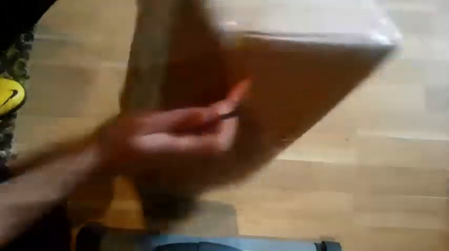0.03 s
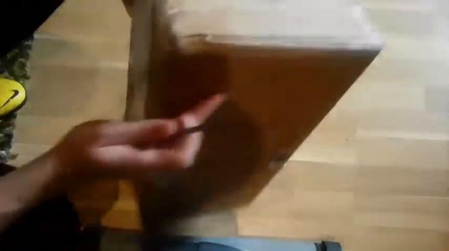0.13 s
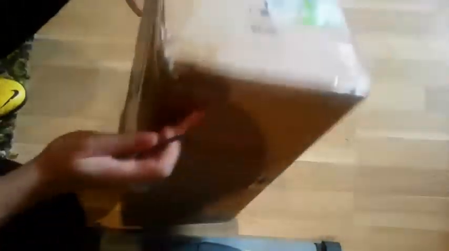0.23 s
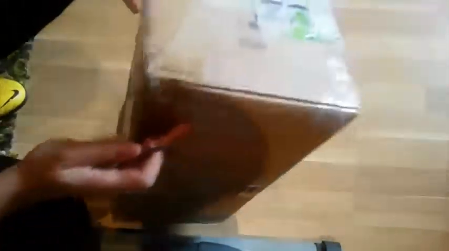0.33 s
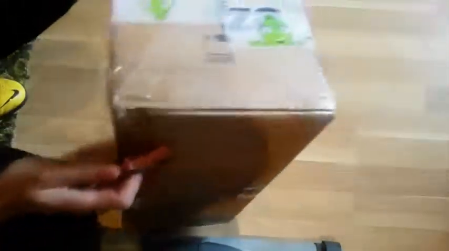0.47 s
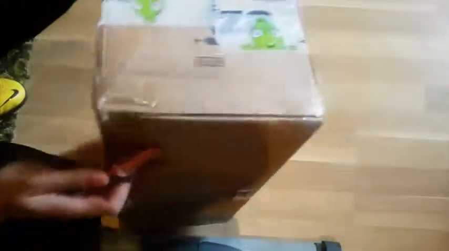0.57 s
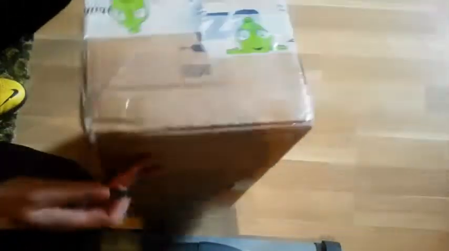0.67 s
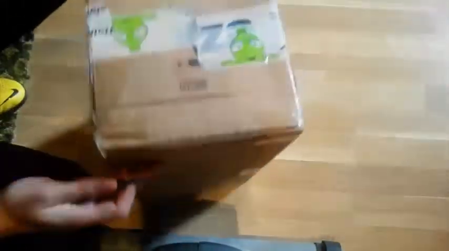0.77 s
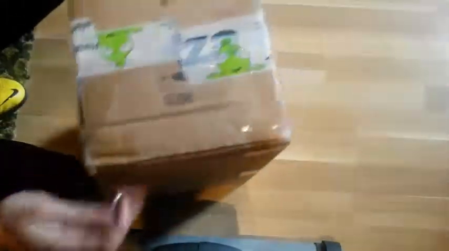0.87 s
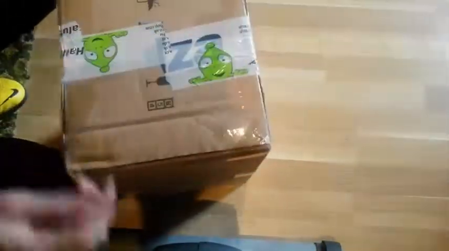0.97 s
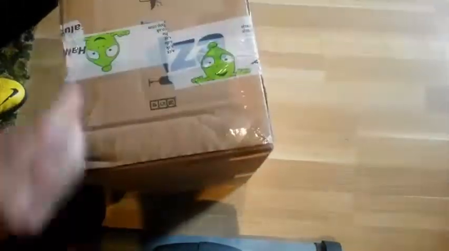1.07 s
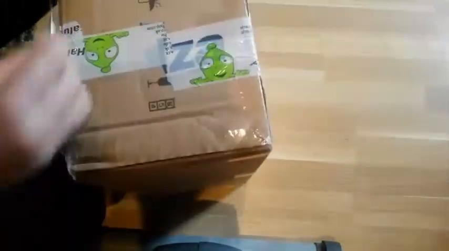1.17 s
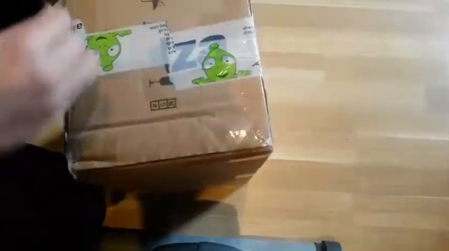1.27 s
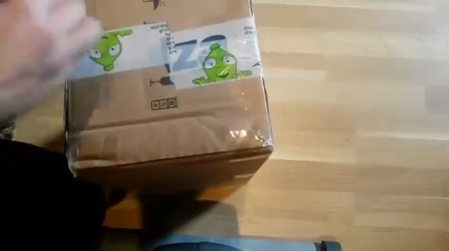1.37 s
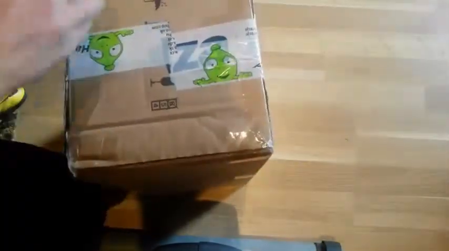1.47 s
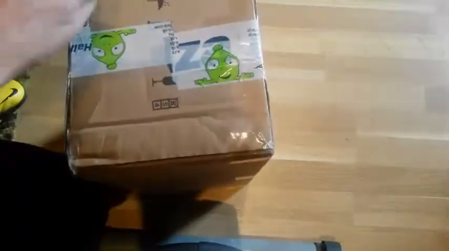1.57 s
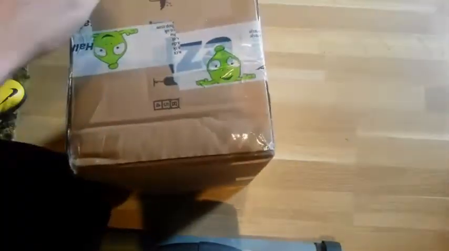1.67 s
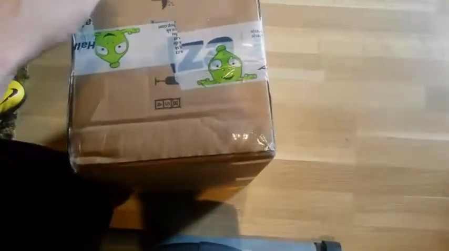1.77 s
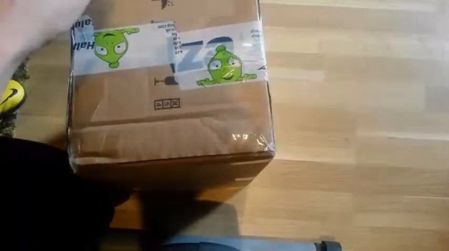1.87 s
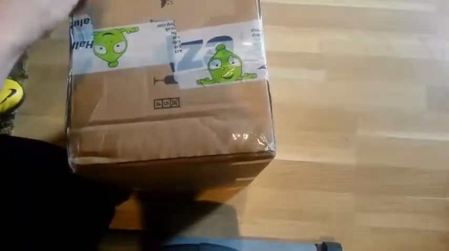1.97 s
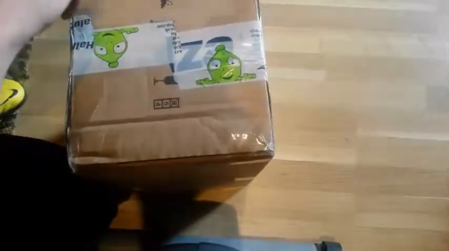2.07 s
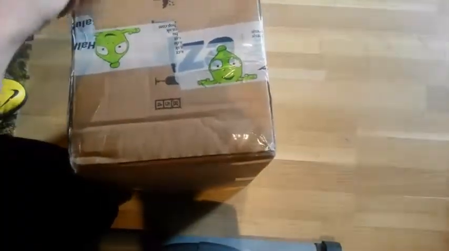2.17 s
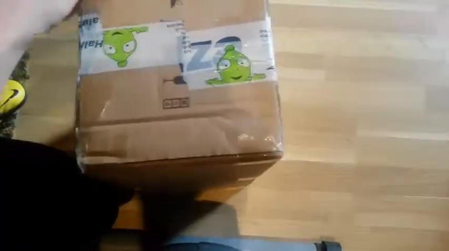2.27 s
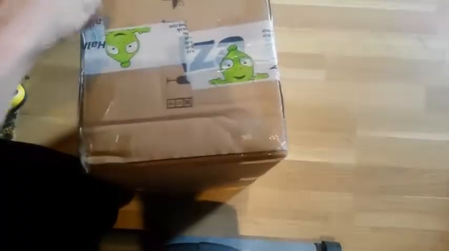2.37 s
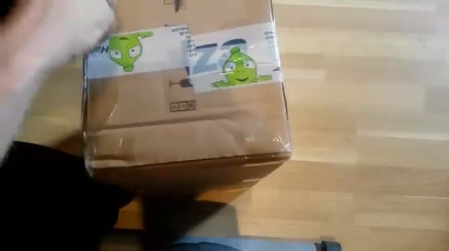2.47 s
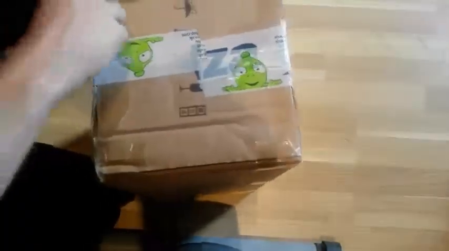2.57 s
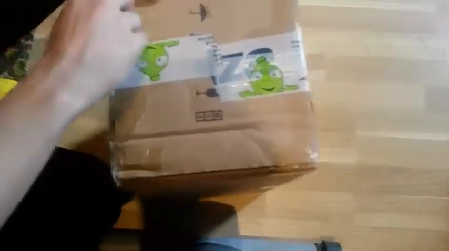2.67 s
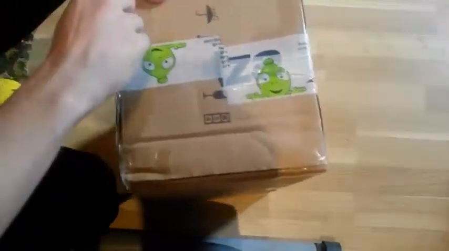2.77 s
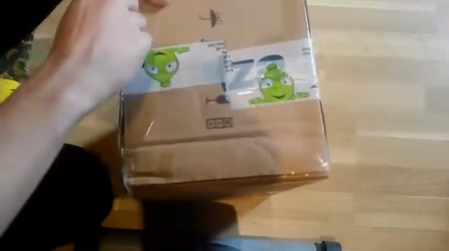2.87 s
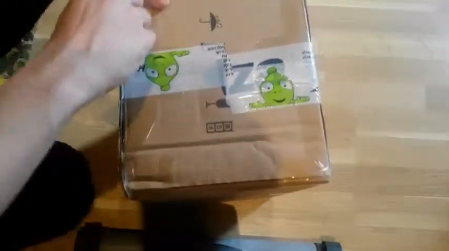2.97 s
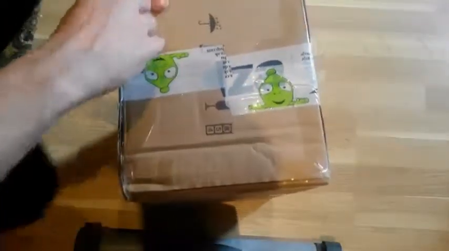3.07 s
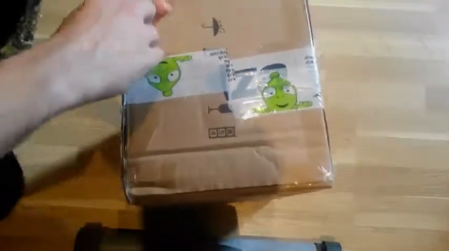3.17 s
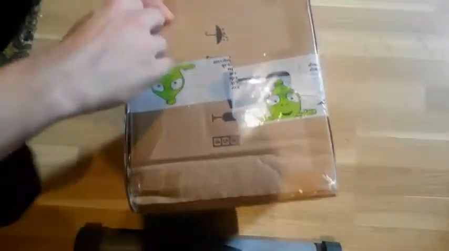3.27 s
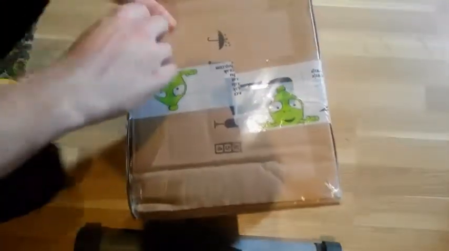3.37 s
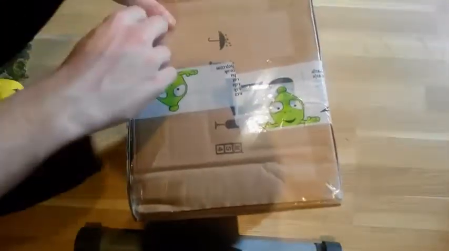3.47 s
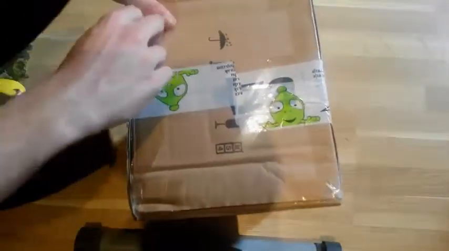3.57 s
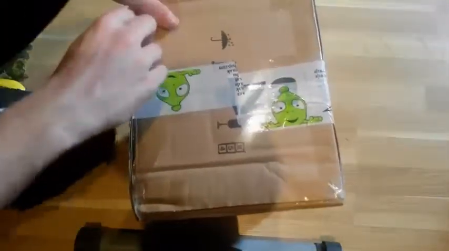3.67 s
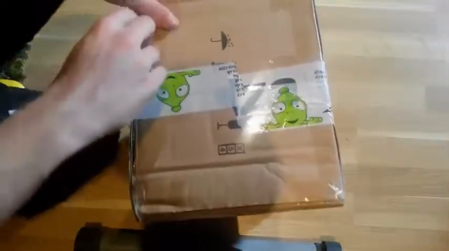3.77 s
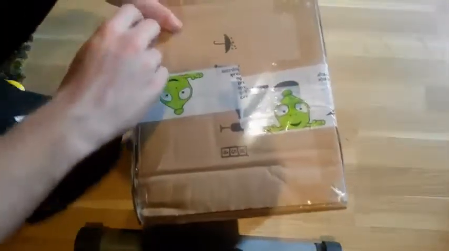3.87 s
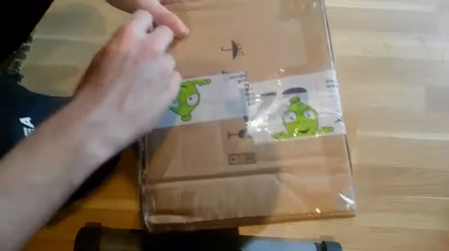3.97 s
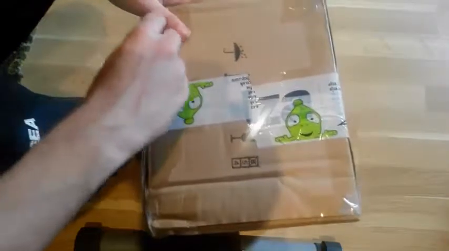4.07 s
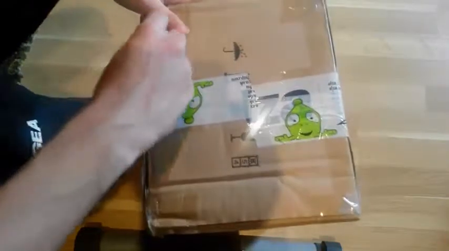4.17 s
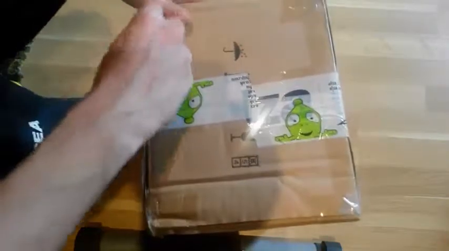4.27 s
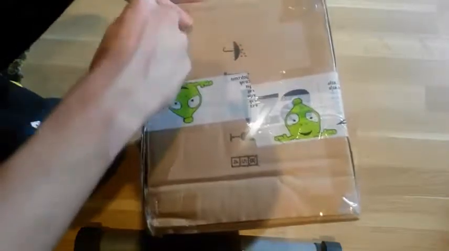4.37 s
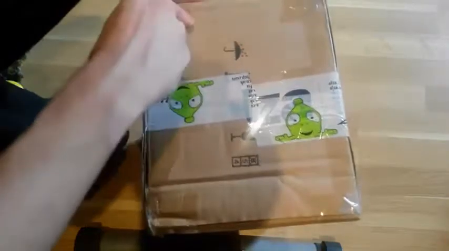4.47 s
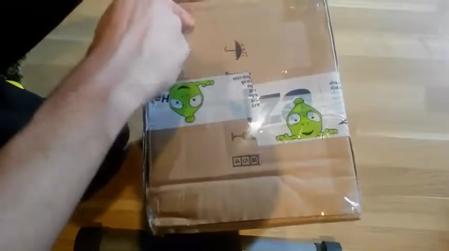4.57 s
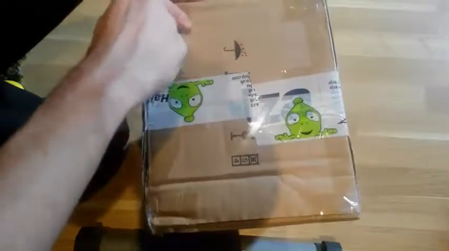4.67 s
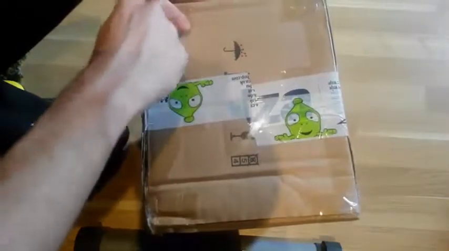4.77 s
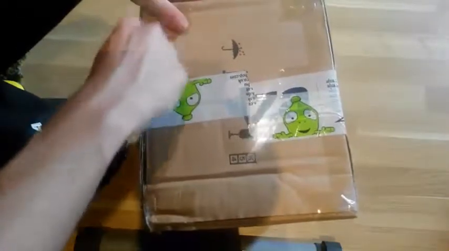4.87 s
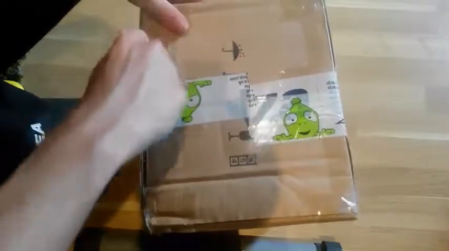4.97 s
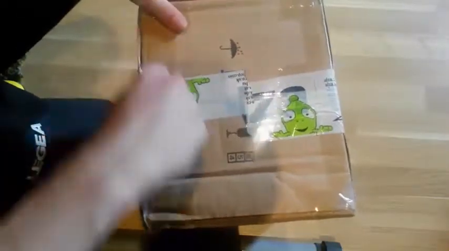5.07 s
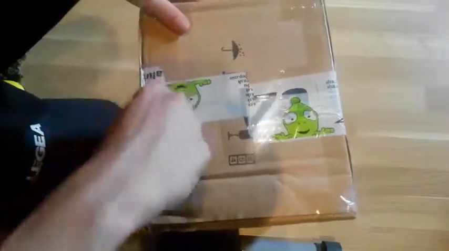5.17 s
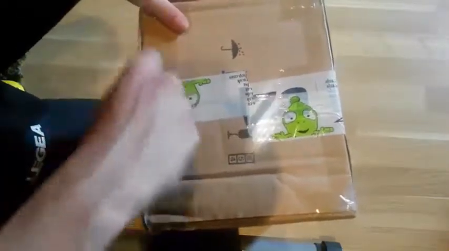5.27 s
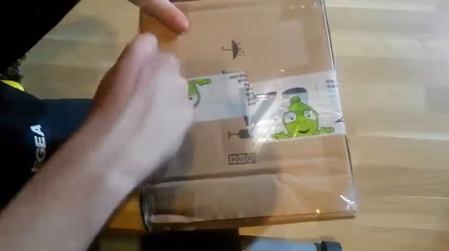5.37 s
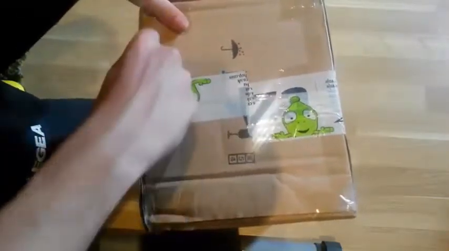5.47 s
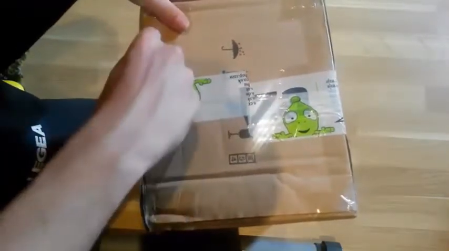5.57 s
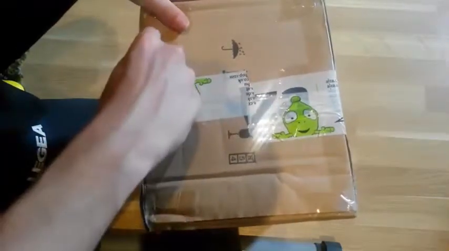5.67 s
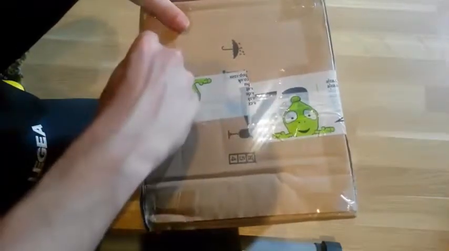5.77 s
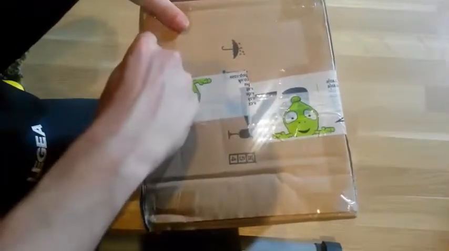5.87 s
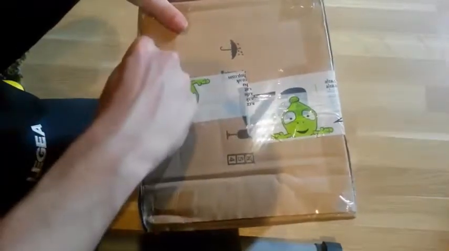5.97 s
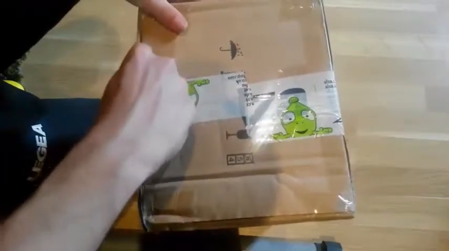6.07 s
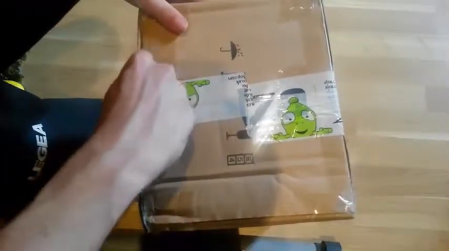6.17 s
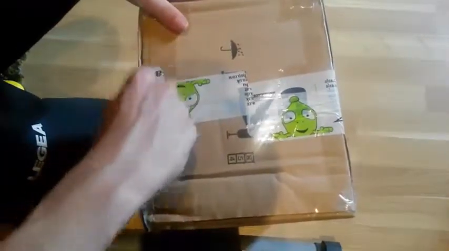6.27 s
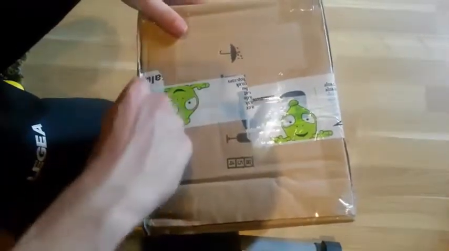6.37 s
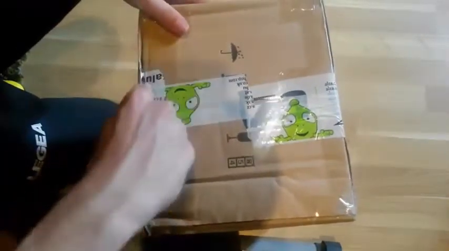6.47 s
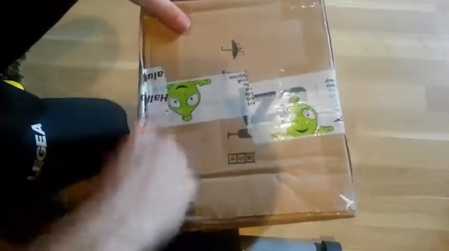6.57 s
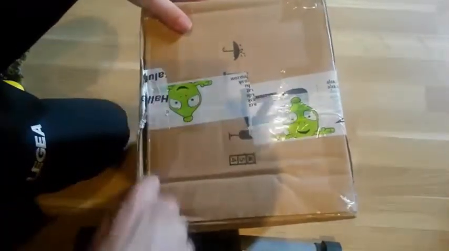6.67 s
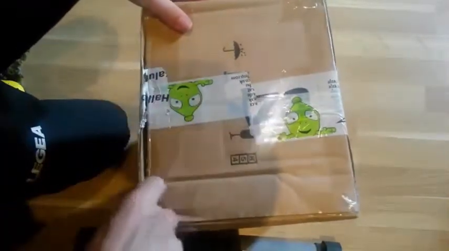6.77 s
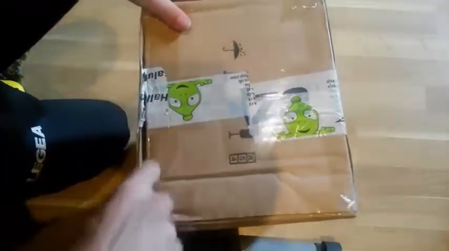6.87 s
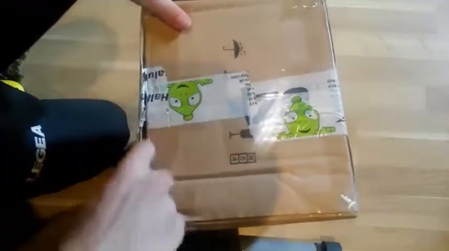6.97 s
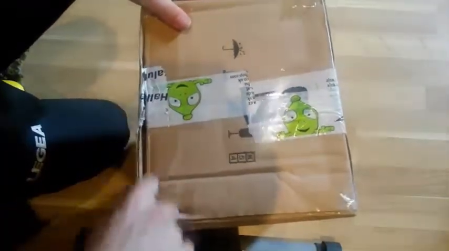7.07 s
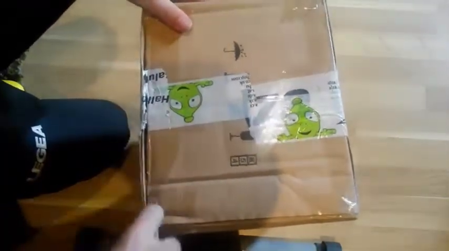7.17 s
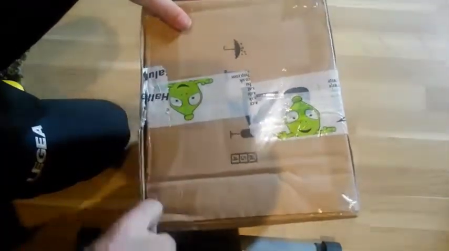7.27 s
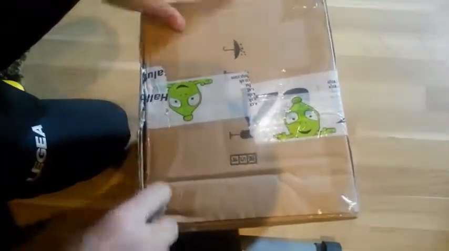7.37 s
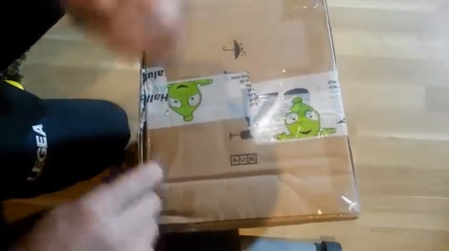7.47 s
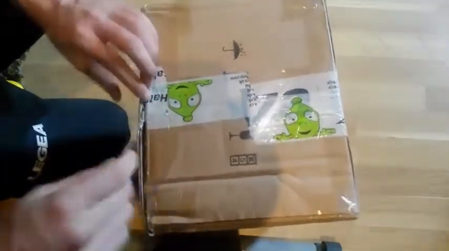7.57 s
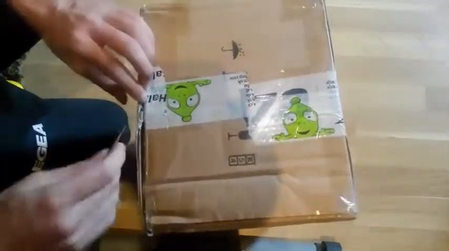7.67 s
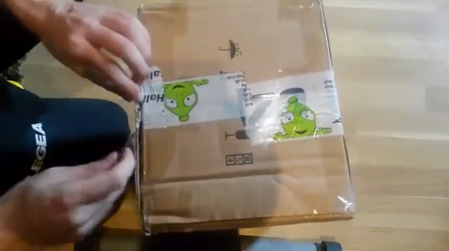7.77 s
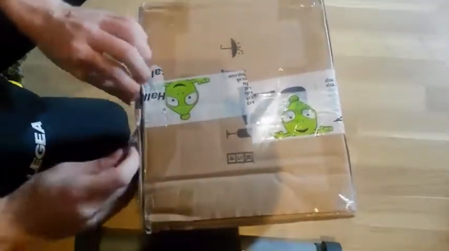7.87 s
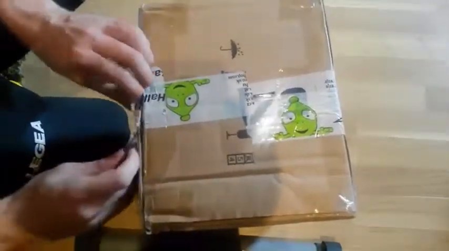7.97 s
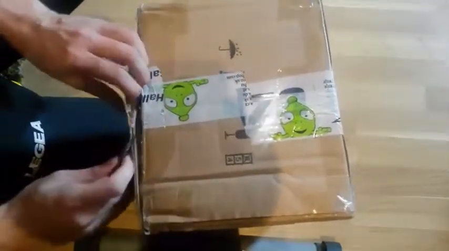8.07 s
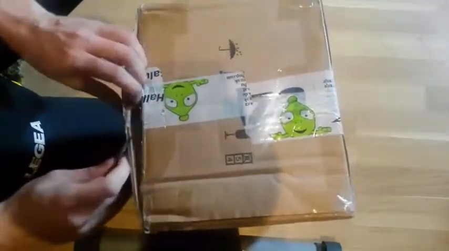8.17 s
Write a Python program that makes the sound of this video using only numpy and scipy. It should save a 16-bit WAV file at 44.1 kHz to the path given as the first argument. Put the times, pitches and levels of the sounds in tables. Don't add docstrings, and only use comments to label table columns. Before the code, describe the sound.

Close handling of a cardboard box: hissing slips and dull bumps, a loud pop, faint rubbing and ticks, then jerky bursts of tearing tape.

```python
import sys
import numpy as np
from scipy import signal
from scipy.fft import rfft, irfft, next_fast_len
from scipy.io import wavfile
from scipy.ndimage import uniform_filter1d

SR = 44100
rng = np.random.default_rng(int(sys.argv[2]) if len(sys.argv) > 2 else 0)


def wav_out(sig):
    wavfile.write(sys.argv[1], SR, np.round(np.clip(np.atleast_2d(sig).T, -1, 1) * 32767).astype(np.int16))


def boost_factor(decibels):
    exponent = np.asarray(decibels, float) / 20
    return 10 ** exponent


N = 362943

# freq_hz, density_db_per_hz
HUSH_SPECTRUM = [(18, -30), (50, -8), (75, -5.5), (140, -3), (290, -6), (901, -11.5), (1740, -15),
                 (16400, -17.5)]
# freq_hz, likeness_0_to_1
LIKENESS = [(100, 0.92), (600, 0.66), (1100, 0.34), (1600, 0.072), (3000, 0.14), (7000, 0.012)]
# freq_hz, left_minus_right_db
LEAN = [(60, 4), (180, 4), (550, 6), (1650, 4), (4970, 4), (15000, -3.5)]
# freq_hz, density_db_per_hz
FILM_SPECTRUM = [(760, -16), (1350, -9), (2630, -5.5), (3640, -7), (4540, -4), (7430, -2), (14700, -15),
                 (16000, -38.5)]
# freq_hz, width_hz, level_db
FILM_SHEEN = [(8140, 620, -4), (12100, 2500, -3.5)]
# freq_hz, width_hz, level_db
BOX_MODES = [(440, 69, -0.5), (690, 290, -3), (890, 110, 2), (1040, 44, -4.5)]
# freq_hz, width_hz, level_db
WALL_MODES = [(84.6, 61, -6.5), (124, 73, -1.5), (187, 43, -0.5), (300, 218, -6.5)]
# freq_hz, width_hz, level_db
TAUT_MODES = [(452, 45, -7), (935, 80, 0), (1070, 90, -3)]
# peak_s, hiss_db, rise_s_per_20db, fall_s_per_20db, box_weight_db
TURNING = [(.05, -46, 1, 0.48, 1.5), (.33, -40, 0.36, 0.32, 1.5), (.424, -31.5, 0.064, 0.091, 2.5),
           (.63, -44.5, 0.13, 0.14, -4), (.78, -50, 0.11, 0.24, -6.5), (0.984, -36.5, 0.1, 0.2, 3.5),
           (1.1, -47, .1, 0.075, -8.5), (1.18, -42, 0.12, 0.076, 0.5), (1.309, -58.5, .1, 0.13, 5.5)]
# peak_s, hiss_db, rise_s_per_20db, fall_s_per_20db, box_weight_db
RUBBING = [(1.493, -57, 0.076, 0.087, -1.5), (1.699, -62.5, 0.063, 0.23, -5), (1.6, -73.5, 0.092, .1, 3),
           (1.82, -72.5, 0.13, 0.3, 1), (1.93, -69.5, 0.093, .08, 2), (2.23, -70, 0.16, 0.08, -3),
           (2.33, -64.5, 0.15, 0.28, 1.5), (2.44, -66, 0.13, 0.17, 18), (2.535, -57, 0.063, 0.11, 14),
           (2.661, -49, 0.09, 0.48, 5), (2.855, -42, 0.37, 0.13, -7), (3.058, -45.5, 0.4, 0.15, -5),
           (3.431, -51.5, 0.16, 0.23, 2.5), (3.545, -49.5, 0.34, 0.085, -0.5), (3.72, -69, 0.069, 0.18, 1),
           (3.94, -72.5, 0.038, 0.049, 8), (4.101, -53.5, 0.042, 0.21, -4), (4.19, -50.5, 0.42, 0.12, -1),
           (4.27, -62, .1, 0.041, -4), (4.429, -63, 0.056, 0.14, 5.5), (4.596, -58, 0.064, 0.093, -2)]
# peak_s, hiss_db, rise_s_per_20db, fall_s_per_20db, box_weight_db
PULLING = [(4.842, -55.5, 0.067, 0.13, -4.5), (4.992, -43, 0.026, 0.14, 0), (5.098, -47.5, 0.22, 0.12, 2.5),
           (5.228, -26.5, 0.01, 0.1, 0), (5.285, -27.5, 0.062, .1, 6.5), (5.341, -36, 0.13, 0.093, 2.5),
           (6.14, -75, .1, 0.066, 0), (6.199, -51, 0.029, 0.098, 2.5), (6.356, -60, 0.026, 0.046, 2.5),
           (6.41, -66.5, 0.045, .05, 4), (6.441, -50, 0.03, 0.053, -3), (6.655, -67, .08, 0.053, 8),
           (6.53, -48.5, 0.027, 0.077, -4), (6.83, -32.5, 0.13, 0.097, 3), (7.08, -41.5, 0.038, 0.066, -5),
           (7.186, -38, 0.025, 0.23, -9.5), (7.262, -37, .1, 0.18, 8), (7.42, -52, 0.36, 0.35, -5),
           (7.583, -32.5, 0.053, 0.067, -5.5), (7.02, -59, 0.091, 0.078, 1),
           (7.766, -54, 0.023, 0.053, 1.5), (7.85, -75.5, .08, 0.15, 4), (8.006, -55, 0.032, 0.087, 6),
           (8.09, -53.5, 0.11, 0.075, 2), (8.212, -48, 0.02, .25, -3)]
# wall_boom_db, box_drum_db, brightness_db, swell_roundness
STROKE_FEEL = [
    (-6.5, -8.5, -5, 0.91),
    (-8.5, -9.5, -5, 1.35),
    (-6, -5.5, -5, 1.25),
]
# start_s, hiss_db, fall_s_per_20db (sign ignored), wall_boom_db, box_drum_db
JERKS = [(.73, -48, 0.31, 11.5, -5.5), (2.199, -54, 0.06, -5, -6.5), (3.819, -60, 0.1, -3.5, -12),
         (4.803, -64.5, 0.5, -14, -10.5), (4.869, -40, 0.0734, -4.5, -15.5),
         (5.201, -29.5, -0.0557, -7, 1.5), (6.079, -74.5, -3, -7, -17), (6.172, -41, 0.03, -6, -1.5),
         (6.457, -28, 0.09, -5, 0), (6.676, -32, 0.1446, -10, 6.5), (6.703, -46, 0.16, -1, 8),
         (6.746, -23.5, 0.1554, -4.5, -8), (7.547, -42, 0.0848, -30, -4), (7.894, -59.5, 0.5, -4.5, -10),
         (8.024, -39.5, 0.06, -0.5, 2), (8.188, -35.5, 0.16, 1.5, 3.5)]
# freq_hz, t60_s
ROOM_DECAY = [(150, 0.21), (1000, 0.2), (5000, 0.28), (14000, 0.26)]
# start_s, peak_db, wall_hz
BUMPS = [(0.095, -36.5, 251), (0.11, -35.5, 285), (0.124, -33, 470), (0.267, -25, 176), (0.402, -35, 89),
         (0.597, -36, 226), (0.7309, -33.5, 158), (0.9118, -38.5, 265), (0.935, -32.5, 217),
         (0.975, -30, 93), (2.177, -56, 232), (2.518, -46, 158), (3.413, -42.5, 690), (3.484, -40.5, 217),
         (3.927, -56.5, 89), (4.424, -54, 235), (4.866, -39, 137), (4.982, -44, 118), (5.069, -36, 110),
         (6.686, -25, 129.5), (6.676, -17.5, 457), (6.713, -22, 450), (6.744, -17.5, 468),
         (6.808, -19, 126), (6.861, -30.5, 140), (7.211, -31.5, 126), (7.241, -31, 470),
         (7.755, -36.5, 130.5), (8.023, -31, 137), (8.189, -28.5, 322)]
# start_s, peak_db, flap_hz
FLAP_BLOWS = [
    (2.171, -62, 765),
    (2.666, -37, 956),
    (2.667, -41, 195),
    (5.894, -76, 900),
    (6.768, -24.5, 455),
    (6.233, -39.5, 940),
    (7.06, -47, 875),
    (7.756, -40, 910),
    (7.936, -47.5, 902),
    (7.952, -64, 865),
              (3.398, -49, 700), (3.428, -44.5, 690), (5.198, -25, 598), (5.222, -26.5, 455), (5.229, -22, 974),
          (5.237, -22.5, 960), (5.248, -20, 985), (6.6765, -24.5, 797), (6.682, -23, 910),
          (5.245, -26, 608), (5.276, -20.5, 269), (5.304, -24, 800), (5.34, -26, 215), (6.459, -24.5, 436),
          (6.499, -45, 493), (6.711, -30, 918), (6.726, -35, 900), (6.75, -23, 877), (6.804, -31.5, 942),
          (6.806, -36, 533), (6.845, -32, 501), (7.275, -29, 900), (7.318, -36, 500)]
# start_s, peak_db
CREASES = [(0.097, -37), (0.2866, -23.5), (0.4185, -31), (0.765, -34), (0.7836, -29.5), (0.8585, -51),
           (0.9822, -37), (1.068, -34), (1.114, -28), (1.174, -37), (1.482, -36.5), (1.4954, -43),
           (1.701, -49), (2.345, -50), (2.583, -43.5), (2.718, -37.5), (4.0788, -40), (4.2659, -48),
           (4.282, -40), (4.4268, -44.5), (4.4787, -48), (4.559, -46.5)]
# start_s, peak_db
THREADS = [(4.823, -44.5), (4.8688, -32), (4.9142, -36), (4.982, -37), (5.0788, -24), (5.7226, -64),
           (6.3933, -46), (6.4116, -45), (6.4319, -39), (7.0691, -36), (7.1358, -35), (7.1658, -33),
           (7.1867, -33), (7.4995, -34), (7.5707, -20), (7.9997, -40), (8.1868, -15), (8.191, -25)]
# knock_re_snap_db, centre_hz, centre_scatter_share
SMALL_SNAP_KINDS = [
    (-22, 6200, 0.033),
    (-29, 6700, 0.033),
]
# start_s, peak_db, knock_re_snap_db, centre_hz
CRACKS = [(5.1998, -9.5, -4, 2780), (5.225, -17, -10, 4690), (5.2458, -11, -8.5, 4500),
          (5.257, -10, -2, 4500), (5.2767, -9.5, -14, 4530), (5.2862, -20.5, -20, 4850),
          (5.3043, -10, -10, 2640), (5.3133, -12.5, -3.5, 7100), (5.3448, -13, -7.5, 5700),
          (5.3503, -17, -31, 5580), (6.1727, -25, -3.5, 6700), (6.4623, -7, -10.5, 5930),
          (6.6762, -10.5, -1, 5030), (6.6789, -17.5, -12.5, 5500), (6.6826, -13.5, -8.5, 5500),
          (6.7385, -16.5, -12, 4500), (6.7407, -13, -18, 5000), (6.743, -10, -15, 4230),
          (6.7526, -6.5, -29, 2820), (6.756, -14.5, -29, 2900), (6.7602, -13, -27.5, 2700),
          (6.7901, -13, -27, 5560), (6.8502, -13.5, -14.5, 5900), (7.2422, -21.5, -8.5, 4670),
          (7.3194, -23.5, -6, 5960), (8.0212, -18.5, -18, 5200), (8.0282, -24.5, -10, 3040),
          (8.0313, -21.5, -22, 6800)]
# start_s, peak_db, knock_re_snap_db, centre_hz
TICKS = [(2.1965, -33, -30, 6450), (2.4515, -38, -30, 7000), (2.489, -34.5, -30, 7500),
         (2.518, -28.5, -19, 6160), (2.5315, -30.5, -22, 4960), (2.546, -44, -30, 7500),
         (2.598, -46, -30, 6500), (3.8103, -32.5, -31, 7300), (3.8397, -42, -30, 3200),
         (4.5873, -37.5, -30, 2800), (4.5922, -34, -35, 2500), (4.612, -31.5, -31, 2680),
         (4.798, -28.5, -23.5, 2370), (4.8325, -31, -29, 4500), (6.0768, -35, -35, 8080),
         (7.403, -35, -30, 6840), (7.413, -30.5, -30, 5800), (7.506, -36, -30, 6500),
         (7.5467, -21, -17, 6040), (7.5545, -26.5, -29, 6140), (7.5776, -12.5, -18, 6440),
         (7.5813, -12, -29, 5500), (7.5902, -11, -31, 5000), (7.89, -19.5, -33, 6700),
         (7.8902, -38.5, -35, 1980), (8.115, -28, -29, 6000), (8.023, -20, -30, 1980)]
# rustle_re_crack_db, broad_share, width_share_of_centre
SNAP_TONES = [
    (-12.5, 0.16, 0.17),
    (-12.5, 0.42, 0.3),
    (-18, 0.34, 0.54),
]
# start_s, peak_db, swing_hz
THUDS = [(.727, -30.5, 271), (0.9087, -34.5, 420), (2.198, -45, 830), (2.666, -38.5, 538),
         (5.284, -21.5, 260), (5.3141, -17.5, 521), (6.814, -29.5, 200.5), (8.023, -27, 480),
         (8.188, -27.5, 380), (8.1915, -27, 328), (6.681, -24.5, 464), (7.757, -43, 262), (6.174, -46, 110)]
# start_s, end_s, depth_db
DUCKS = [
    (5.183, 5.193, -28),
    (6.057, 6.072, -14),
    (6.161, 6.168, -14),
    (6.441, 6.45, -10),
    (6.731, 6.739, -8),
    (7.533, 7.541, -10),
    (7.872, 7.885, -16),
    (8.17, 8.183, -22),
]


def unit(x):
    return x / np.sqrt(np.mean(x ** 2) + 1e-20)


def along(points, hz):
    freq_hz, value = np.transpose(points)
    return np.interp(np.log(hz + 1), np.log(freq_hz + 1), value)


def filtered(x, response):
    m = next_fast_len(N + SR // 2)
    return irfft(rfft(x, m) * response(np.fft.rfftfreq(m, 1 / SR)), m)[..., :N]


def resonance(f, hz, width_hz):
    return 1j * f * width_hz / (hz * hz - f * f + 1j * f * width_hz)


def modes(table):
    def response(f):
        return sum((-1) ** k * boost_factor(db) * resonance(f, hz, width_hz)
                   for k, (hz, width_hz, db) in enumerate(table))
    return response


def stereo_noise(patchy_db):
    z = signal.stft(rng.standard_normal((2, N + 512)), nperseg=256)[2]
    field = uniform_filter1d(rng.standard_normal(z.shape[1:]), size=7, axis=0)
    field = uniform_filter1d(field, size=6, axis=1)
    pair = signal.istft(z * boost_factor(patchy_db * unit(field)), nperseg=256)[1][:, :N]

    def mid_side(hz):
        angle = np.arccos(np.clip(along(LIKENESS, hz), 0, 1)) / 2
        return np.array([np.cos(angle), np.sin(angle)])

    mid, side = filtered(pair, mid_side)
    return np.array([mid + side, mid - side])


def hush():
    noise = filtered(stereo_noise(patchy_db=3.0), lambda f: boost_factor(along(HUSH_SPECTRUM, f)))
    return boost_factor(-78.5) * unit(noise)


def slips(rate_hz, spread_db, life_s, smooth):
    chance, size = rng.random((2, N))
    impulses = (chance < rate_hz / SR) * boost_factor(-spread_db * np.log(size + 0.021))
    return smooth + unit(signal.lfilter([1], [1, -np.exp(-1 / (life_s * SR))], impulses))


def stroke_curves():
    rows = []
    for table, (boom_db, drum_db, bright_db, roundness) in zip([TURNING, RUBBING, PULLING], STROKE_FEEL):
        for s, db, rise_s, fall_s, weight_db in table:
            rows.append((s, db, rise_s, fall_s, roundness, boom_db + weight_db, drum_db + weight_db, bright_db))
    jerk_rise_s, jerk_roundness, jerk_bright_db = .003, 1.02, -6.5
    for s, db, fall_s, boom_db, drum_db in JERKS:
        rows.append((s, db, jerk_rise_s, fall_s, jerk_roundness, boom_db, drum_db, jerk_bright_db))
    t = np.arange(0, N / SR, .001)
    s, db, rise_s, fall_s, roundness, *feel = np.transpose(rows)[..., None]
    away = np.where(t < s, (s - t) / np.abs(rise_s), (t - s) / np.abs(fall_s))
    power = boost_factor(np.maximum(db - 20 * away ** roundness, -130)) ** 2
    total = power.sum(axis=0)
    curves = [10 * np.log10(total)] + [(power * c).sum(axis=0) / total for c in feel]
    return [np.interp(np.arange(N) / SR, t, c) for c in curves]


def strokes():
    hiss_db, boom_db, drum_db, bright_db = stroke_curves()
    grain = slips(rate_hz=600, spread_db=2.6, life_s=.0007, smooth=2.5)
    film = unit(filtered(grain * stereo_noise(patchy_db=1.5), lambda f: boost_factor(along(FILM_SPECTRUM, f))))
    high = filtered(film, lambda f: 1 / (1 + (7000 / (f + 1)) ** 6))
    sheen = filtered(film, lambda f: sum(boost_factor(db) * np.abs(resonance(f, hz, width_hz)) ** 2
                                         for hz, width_hz, db in FILM_SHEEN))
    shake = slips(rate_hz=74, spread_db=3, life_s=.005, smooth=2.6) * stereo_noise(patchy_db=1.5)
    pull = np.clip((hiss_db + 43) / 12, 0, 1)
    hiss = film + (boost_factor(bright_db + 2.5) - 1) * high + (1 - pull) * sheen
    slack_drum = np.sqrt(1 - pull) * unit(filtered(shake, modes(BOX_MODES)))
    taut_drum = boost_factor(-2) * np.sqrt(pull) * unit(filtered(shake, modes(TAUT_MODES)))
    boom = unit(filtered(stereo_noise(patchy_db=2), modes(WALL_MODES)))
    out = boost_factor(hiss_db + 0.5) * hiss
    out += boost_factor(hiss_db + drum_db - 1.27) * (slack_drum + taut_drum)
    return out + boost_factor(hiss_db + boom_db - 2.0) * boom


def room(x):
    _, t, z = (hz_t_z := signal.stft(rng.standard_normal((2, SR // 2)), SR, nperseg=256))
    decay = boost_factor(-60 * t / along(ROOM_DECAY, hz_t_z[0])[:, None])
    tail = signal.istft(z * decay, SR, nperseg=256)[1]
    delayed = np.pad(x, ((0, 0), (200, 0)))
    return signal.fftconvolve(delayed, tail / np.linalg.norm(tail[0]), axes=1)[:, :N]


def converter_offset(dry):
    power = np.abs(uniform_filter1d(dry[0] ** 2, size=1000))
    level_db = 10 * np.log10(power + 1e-12)
    level_db = signal.lfilter([5e-4], [1, 5e-4 - 1], level_db + 45) - 45
    quiet_db, offset_quiet, offset_per_db = -82, 1e-4, 8e-6
    return -offset_quiet - offset_per_db * np.clip(level_db - quiet_db, 0, 45)


def bumps():
    out, t = np.zeros(N + SR), np.arange(SR // 8) / SR
    for s, db, hz in BUMPS + FLAP_BLOWS:
        swing = np.sin(2 * np.pi * hz * t) * (1 - np.exp(-t * hz / 0.52))
        swing *= boost_factor(-60 * t / (0.021 + 8 / hz))
        push = 0.5 * np.sin(2 * np.pi * 600 * t) * boost_factor(-60 * t / 0.0077)
        out[round(s * SR):][:len(t)] += boost_factor(db + 1.0) * (swing + push)
    return out[:N]


def snap_rows():
    knock_scatter_db, pan_mean_db, pan_scatter_db = 4, 4, -1
    small = []
    for table, (knock_db, hz, scatter) in zip([CREASES, THREADS], SMALL_SNAP_KINDS):
        for s, db in table:
            a, b = rng.standard_normal(2)
            small.append((s, db, knock_db + knock_scatter_db * a, hz * np.exp(scatter * b)))
    rows = []
    for table, tone in zip([small, CRACKS, TICKS], SNAP_TONES):
        for row in table:
            rows.append((*row, tone, pan_mean_db + pan_scatter_db * rng.standard_normal()))
    return rows


def snaps():
    t = np.arange(SR // 12) / SR
    f = np.fft.rfftfreq(len(t), 1 / SR)
    onset = np.exp(-2j * np.pi * f * .0009)
    crack, blows = np.zeros((2, N + SR)), np.zeros(N + SR)
    for s, db, knock_db, hz, (rustle_db, broad, width), pan_db in snap_rows():
        noise = rng.standard_normal((3, len(t)))
        tick = boost_factor(-60 * t / .0022)
        rustle = boost_factor(rustle_db - 60 * t / .022) * (1 - np.exp(-t / .0006))
        burst = (1.3 * noise[:2] + noise[2]) * (tick + rustle)
        colour = boost_factor(along(FILM_SPECTRUM, f) * .7) * (broad + resonance(f, hz, width * hz))
        echo_s = rng.uniform(.0003, .0008, size=(2, 1))
        echo = 1 - .7 * np.exp(-2j * np.pi * f * echo_s)
        burst = irfft(rfft(burst) * echo * colour * onset, len(t)) * (t < .07)
        burst /= np.abs(burst).max(axis=1, keepdims=True)
        side_db = np.clip(pan_db - 2.5, -8, 8) / 2
        gain = boost_factor(db + 0.2 + np.array([[side_db], [-side_db]]))
        crack[:, round(s * SR):][:, :len(t)] += gain * burst
        blows[round((s + .0007) * SR)] += boost_factor(db + knock_db + 35.0)
    return crack[:, :N] + filtered(blows[:N], modes(TAUT_MODES[1:]))


def thuds():
    out, t = np.zeros(N + SR), np.arange(SR // 50) / SR
    for s, db, hz in THUDS:
        cycles = np.clip(t * hz, 0, 1.25)
        window = np.sin(np.pi * cycles / 1.25) ** .5
        out[round(s * SR):][:len(t)] += boost_factor(db) * np.sin(2 * np.pi * cycles) * window
    return out[:N]


def pop():
    start_s, drain_hz, size = 1.27602, 95, .8
    step = size * np.clip((np.arange(N) / SR - start_s) * SR / 2, 0, 1)
    right = signal.lfilter(*signal.butter(2, drain_hz, "high", fs=SR), step)
    return np.array([0 * step, right])


def ducked(x):
    lost = np.zeros(N)
    for start_s, end_s, depth_db in DUCKS:
        lost[round(start_s * SR):round(end_s * SR)] = 1 - boost_factor(depth_db)
    treble = filtered(x, lambda f: 1 / (1 + (1300 / (f + 1)) ** 4))
    x = x - uniform_filter1d(lost, size=60) * treble
    top = filtered(x, lambda f: 1 / (1 + (6500 / (f + 1)) ** 8))
    return x - uniform_filter1d(.8 * (lost > .65), size=60) * top


def scene():
    parcel = strokes() + bumps() + thuds() + snaps()
    parcel = filtered(parcel, lambda f: boost_factor(np.array([[.5], [-.5]]) * along(LEAN, f)))
    return parcel + boost_factor(-10.5) * room(parcel) + hush()


def low_pass(x):
    return signal.sosfilt(signal.butter(12, 16530, fs=SR, output="sos"), x)


def record(dry):
    x = ducked(dry + pop())
    x = filtered(x, lambda f: (f < 16600) * (.08 + .92 / (1 + (f / 15400) ** 80)))
    return low_pass(x + converter_offset(dry))


dry = scene()
out = record(dry)
wav_out(out)
```